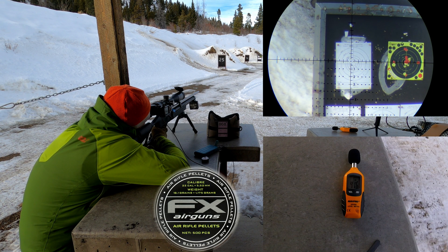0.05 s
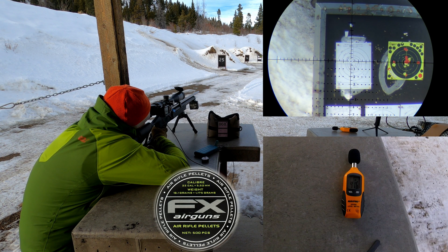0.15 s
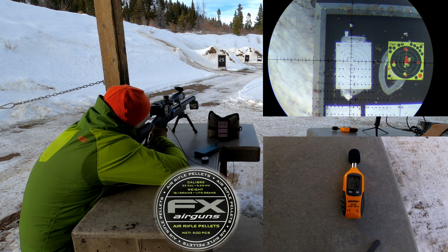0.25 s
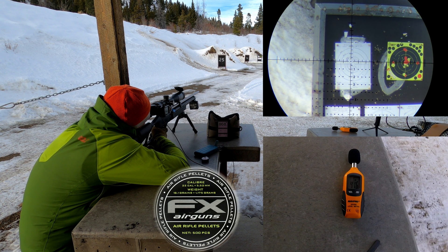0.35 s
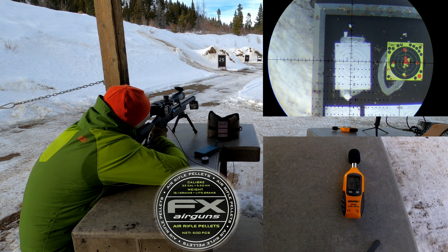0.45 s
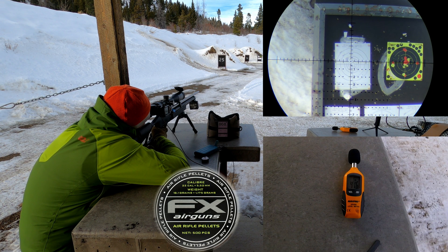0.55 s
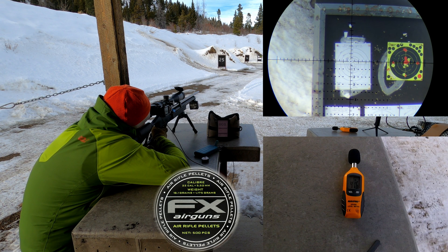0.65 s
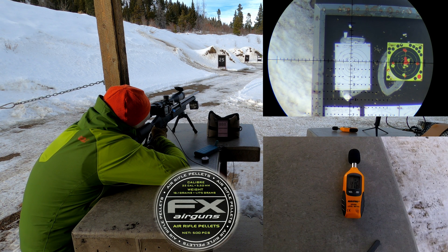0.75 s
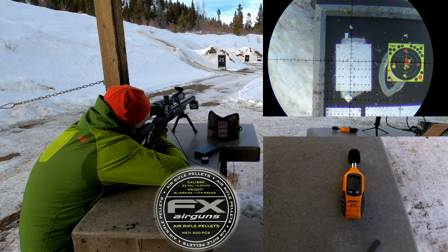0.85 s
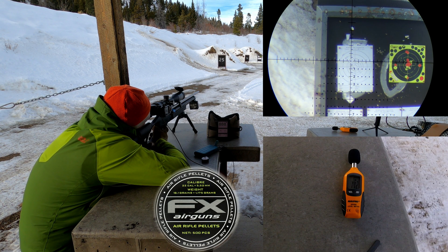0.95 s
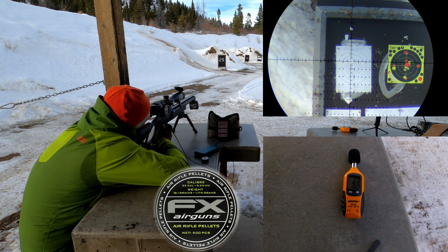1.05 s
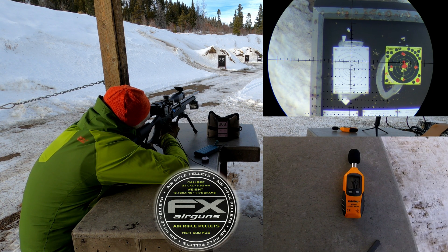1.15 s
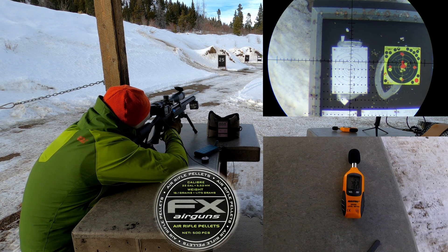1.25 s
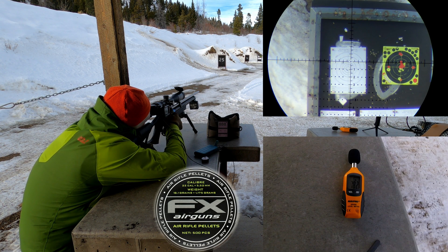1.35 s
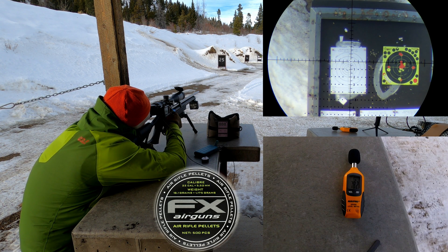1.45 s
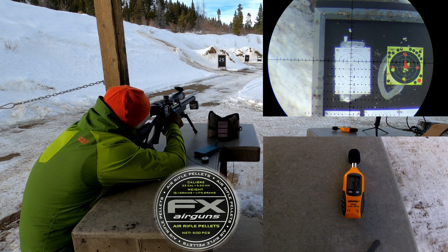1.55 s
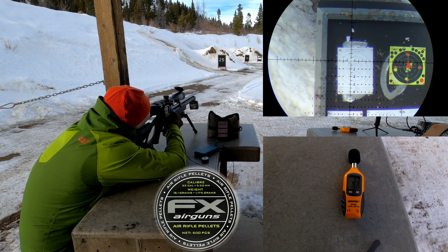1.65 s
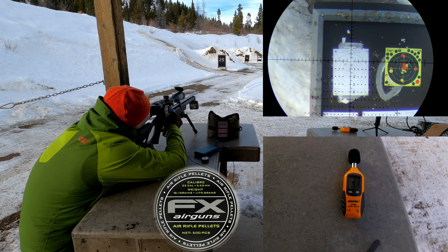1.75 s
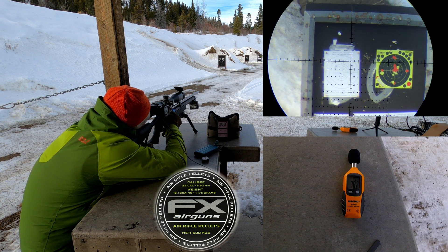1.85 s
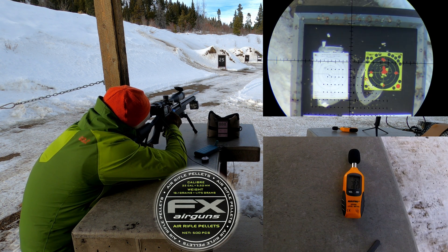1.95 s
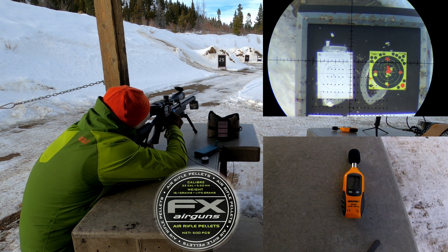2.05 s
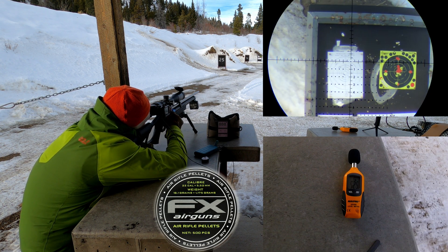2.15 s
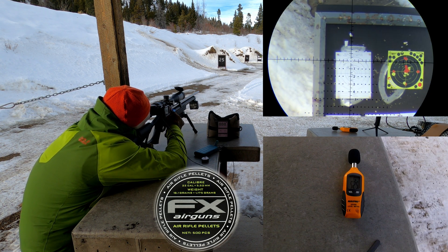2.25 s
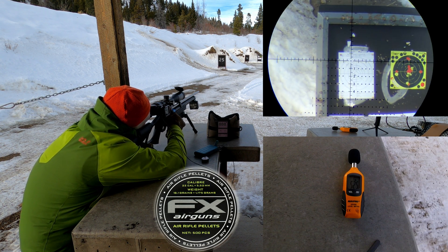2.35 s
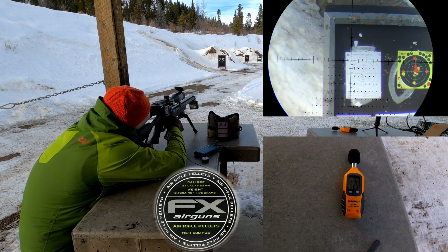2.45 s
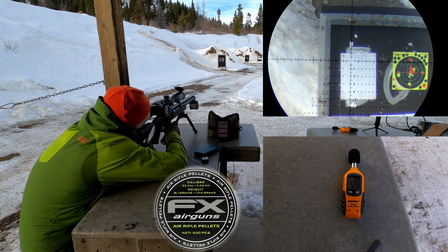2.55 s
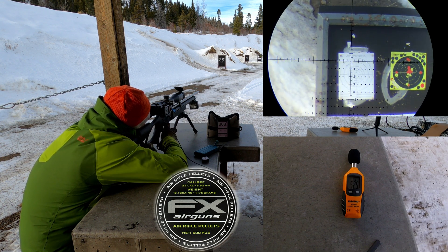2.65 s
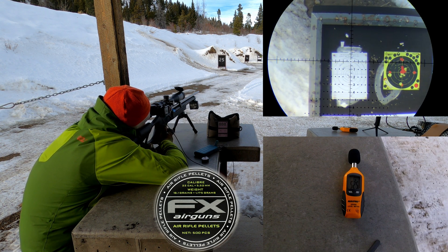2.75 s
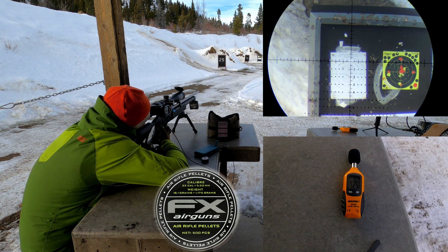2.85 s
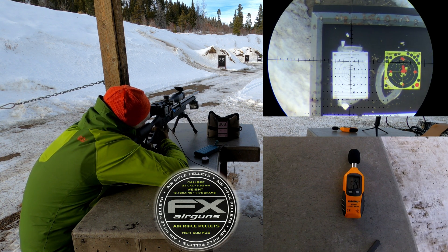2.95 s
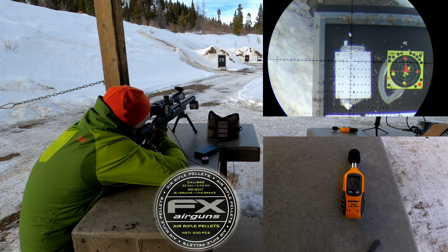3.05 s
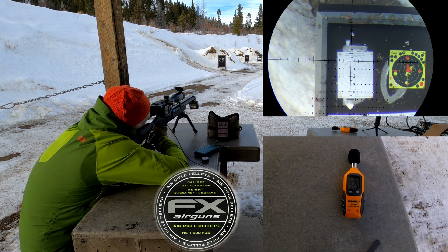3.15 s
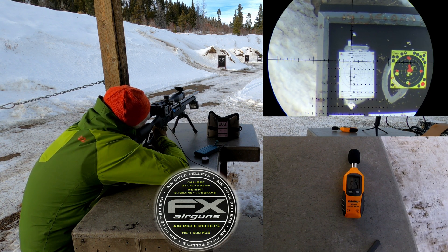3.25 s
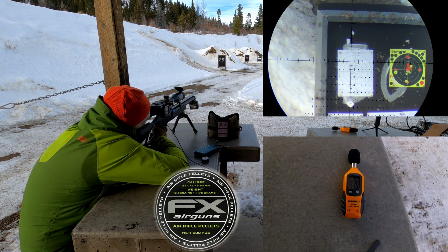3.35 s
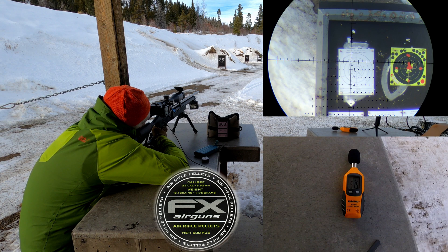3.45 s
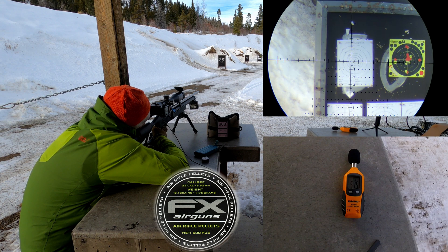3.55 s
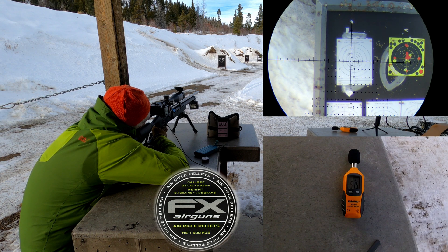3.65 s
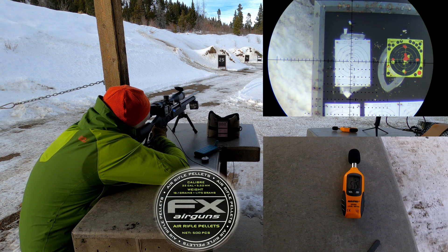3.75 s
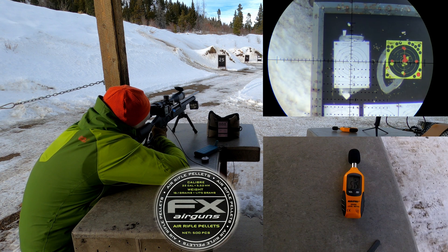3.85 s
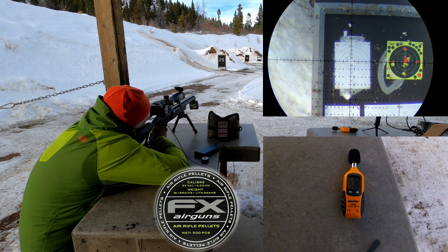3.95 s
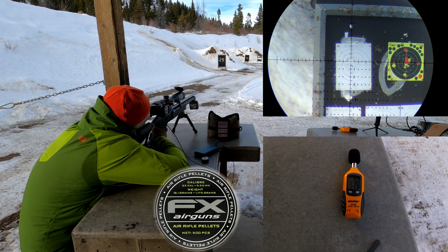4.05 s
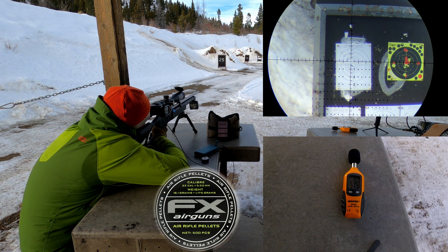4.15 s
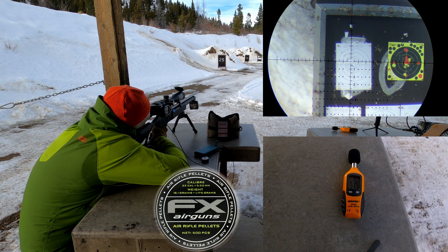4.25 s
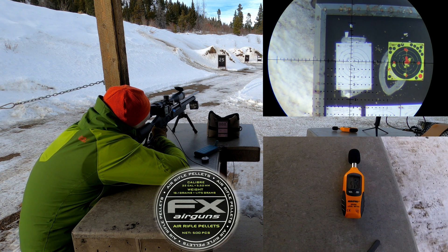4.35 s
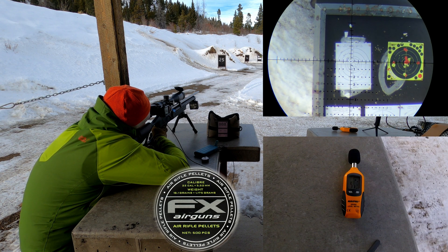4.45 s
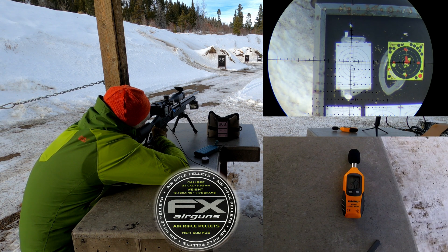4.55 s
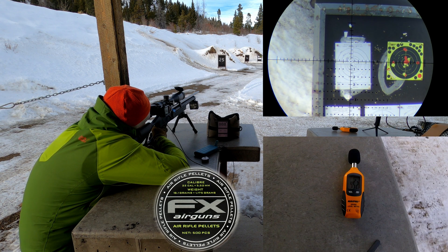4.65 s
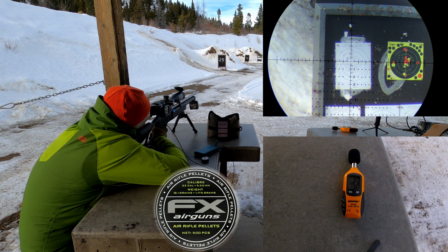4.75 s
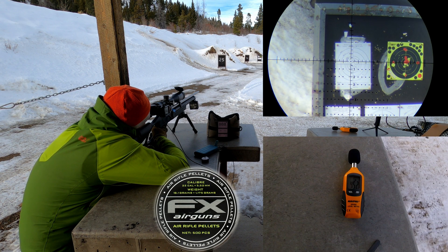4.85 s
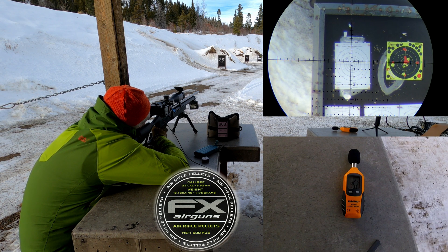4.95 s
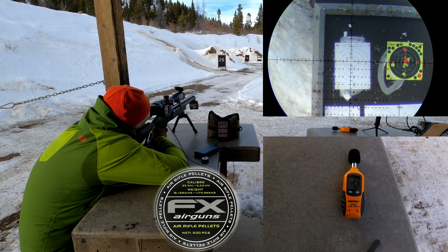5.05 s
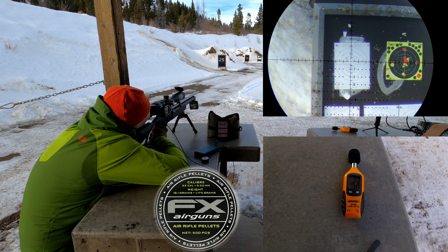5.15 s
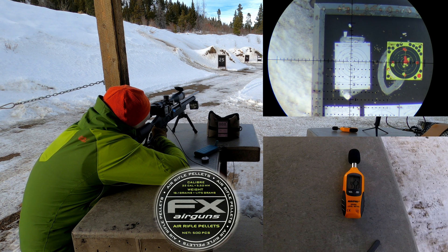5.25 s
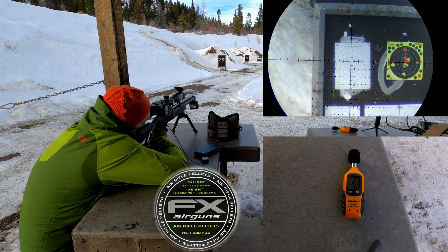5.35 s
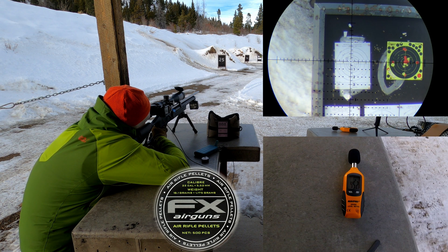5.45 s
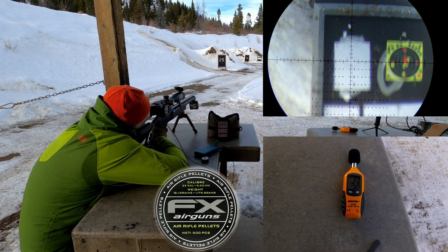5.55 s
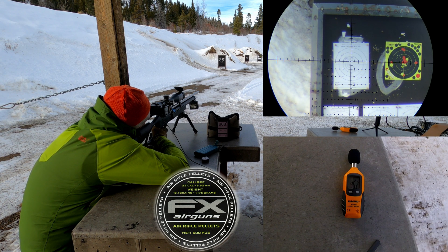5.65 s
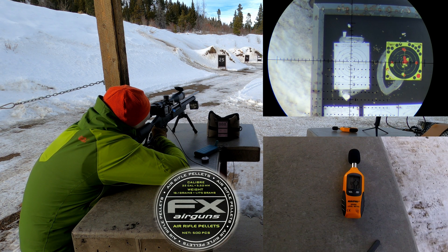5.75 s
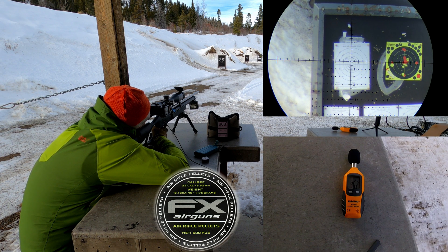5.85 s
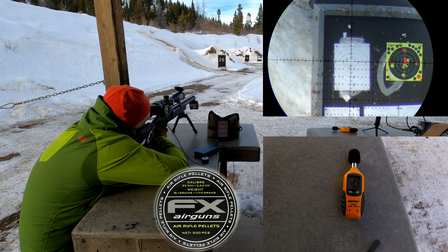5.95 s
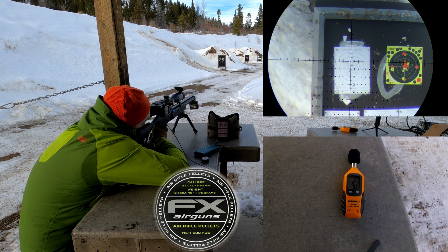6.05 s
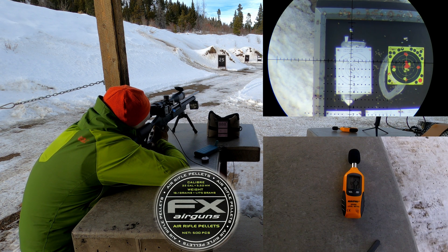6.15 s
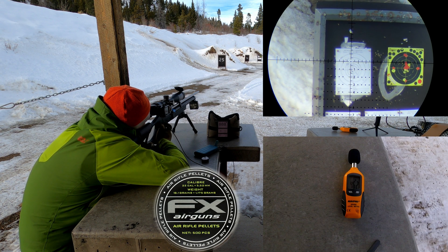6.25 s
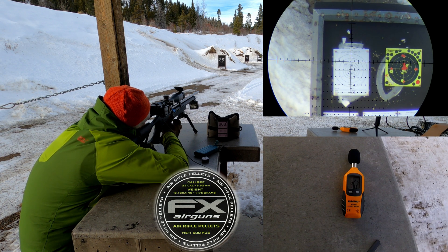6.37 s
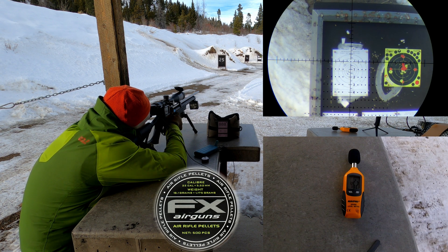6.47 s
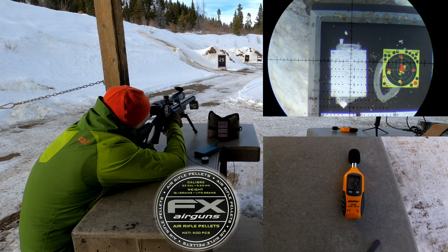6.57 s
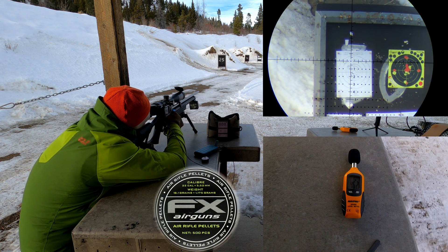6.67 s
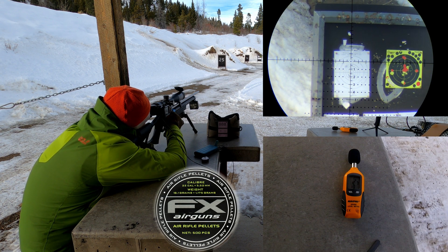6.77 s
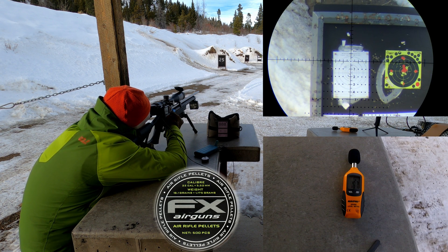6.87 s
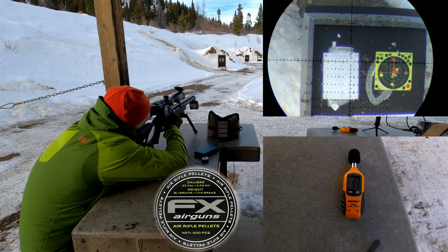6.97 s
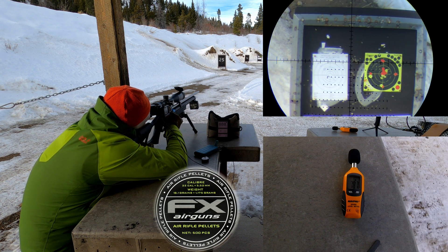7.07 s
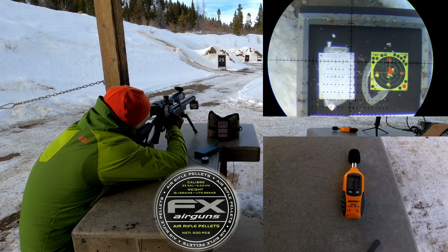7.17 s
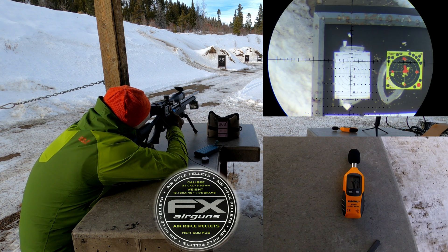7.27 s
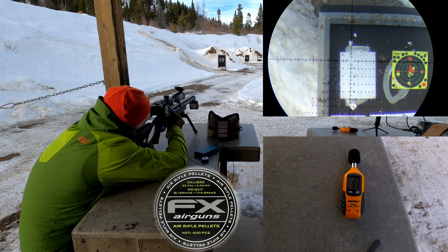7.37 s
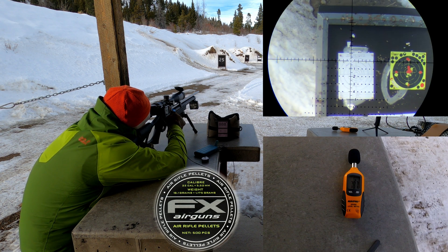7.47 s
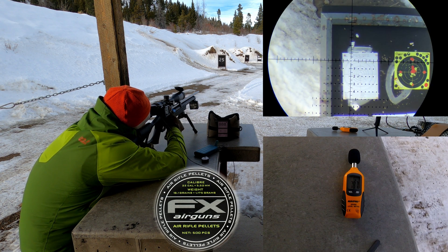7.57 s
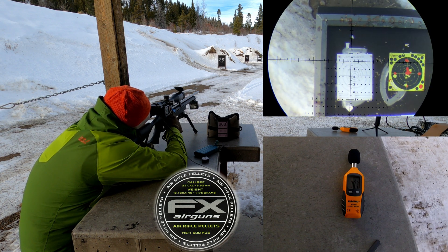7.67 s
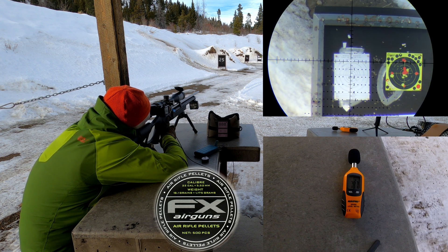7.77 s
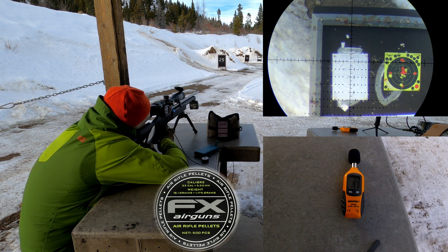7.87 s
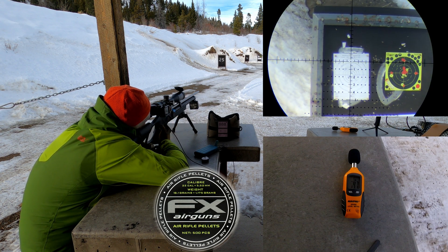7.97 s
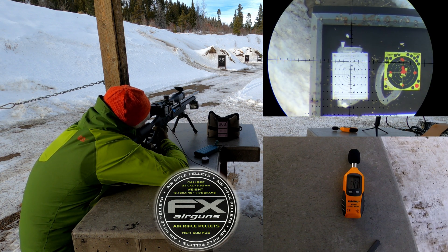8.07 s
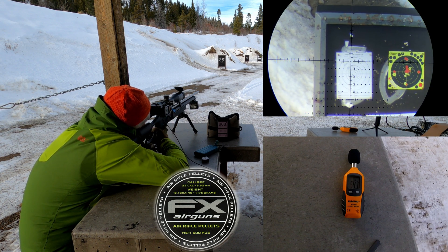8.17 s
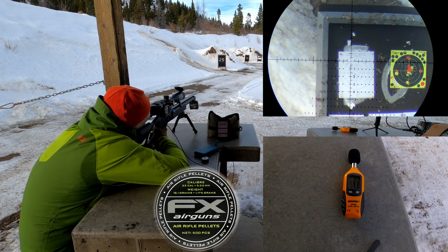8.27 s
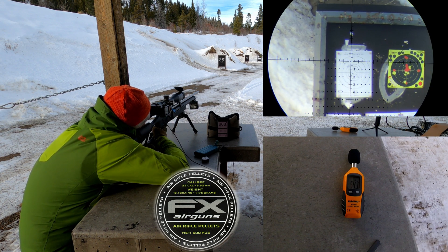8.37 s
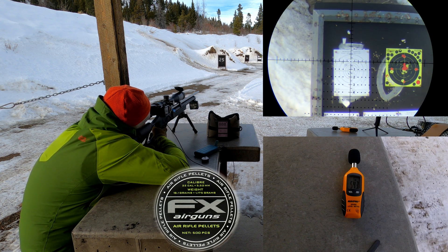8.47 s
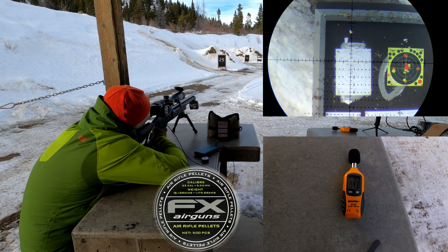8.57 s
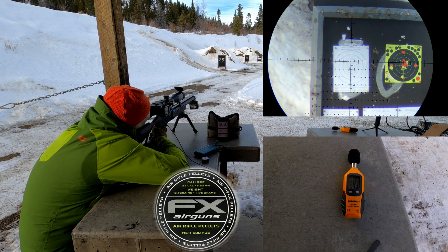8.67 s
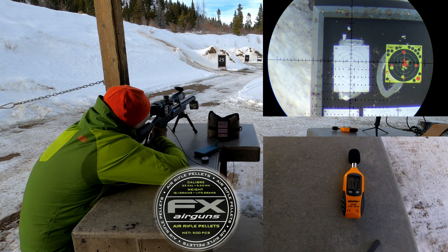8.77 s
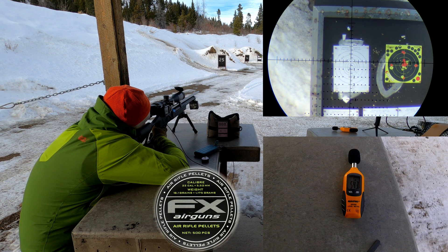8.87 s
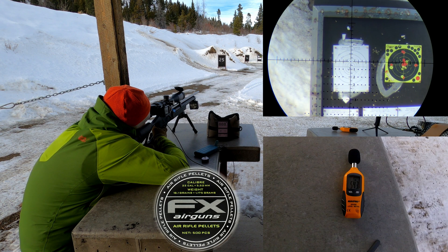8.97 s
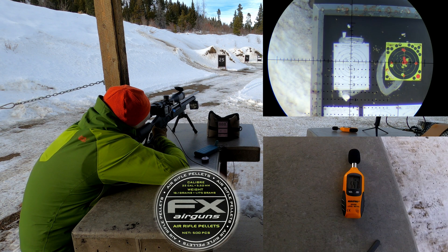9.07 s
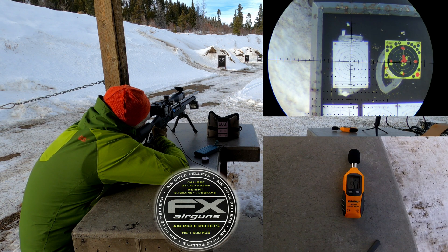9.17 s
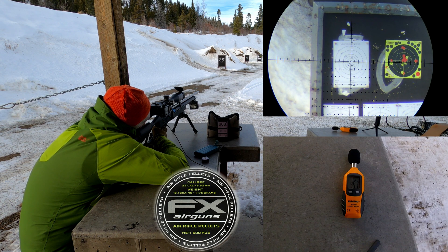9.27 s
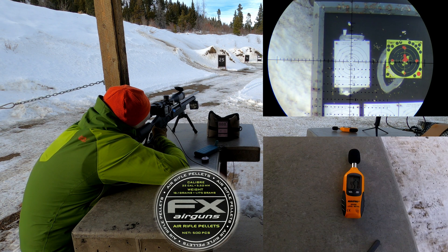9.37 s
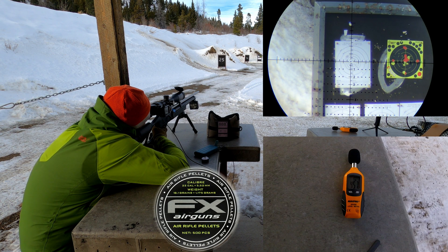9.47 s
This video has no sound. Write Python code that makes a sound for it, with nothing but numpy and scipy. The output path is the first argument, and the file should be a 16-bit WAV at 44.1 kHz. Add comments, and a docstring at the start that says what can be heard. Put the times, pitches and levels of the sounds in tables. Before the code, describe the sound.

A faint, dull wash of wind and far traffic runs throughout. At 0.35 s a close air rifle fires: a very short metallic snap, low bench thump and burst of air dying within about 0.4 s. A strong slap returns at 0.5 s, then weaker slaps and the pellet's distant hit at 0.64 to 0.8 s. A faint tick comes at 0.97 s; from 1.5 to 2.53 s the lever clicks, rattles and clacks in clusters, ending on a firm clack, with soft sleeve rustles until about 3.4 s. The background, ducked after the shot, creeps back. Small cloth touches occur near 4 s. At 5.63 s a second, similar shot cracks, with returns by 6.1 s. Cocking clacks run from 6.7 to 7.66 s, ending with the strongest, then rustling, a tiny tick at 7.94 s and quiet wind to 9.5 s.

```python
"""Air rifle under a range shelter

A pre-charged air rifle fires twice from a bench: ringing contacts, a bench boom and decaying bands of air noise.
From down range come the report off snow banks and the pellet on the far target: pulses with scattered tails.
At the bench the side lever is cocked after each shot (ticks ringing metal modes) and a sleeve rustles (noise).
Far off, wind and traffic are a patchy noise wash; gain control behind the one microphone cuts after loud sound."""
import sys
import numpy as np
from scipy import signal
from scipy.io import wavfile
from scipy.ndimage import uniform_filter1d

SR = 44100
rng = np.random.default_rng(int(sys.argv[2]) if len(sys.argv) > 2 else 0)


def wav_record(signal):
    """Record a signal, one row per channel, as 16-bit PCM in the file named by sys.argv[1]."""
    frames = np.transpose(np.atleast_2d(signal))
    bounded = np.clip(frames, -1, 1)
    # unit amplitude maps onto the largest positive 16-bit level
    quanta = np.round(bounded * 32767).astype(np.int16)
    wavfile.write(sys.argv[1], SR, quanta)


N = 419832

# distant wind in the trees and far traffic, relative spectrum: (frequency [Hz], density [dB per Hz])
WASH_SPECTRUM = [(15, -60.5), (25, -34), (59, -20), (91, -15), (122, -18), (156, -7), (281, -7.5),
                 (359, -1), (1050, -1), (1710, -8), (4380, -34.5), (5430, -36), (9550, -46), (12200, -45),
                 (15500, -77)]
# level of that wash ahead of the gain control: (time [s], level [dB])
WASH_LEVEL = [(0, -46.5), (2.5, -44.5), (3.5, -47), (5.5, -46), (8, -44.5), (8.8, -46), (9.52, -44)]
# rubbing cloth, relative spectrum: (frequency [Hz], density [dB per Hz])
CLOTH_SPECTRUM = [(880, -37), (1500, -13.5), (1860, 1), (3210, -4), (4310, -4), (6010, -10), (8460, -22),
                  (10600, -17.5), (11800, -28), (15500, -60)]
# strokes of the sleeve on jacket and bench: (start [s], hold [s], level [dB])
SLEEVE_STROKES = [(1.2, .15, -57), (2.62, .31, -52), (3.13, .2, -61), (4.03, .01, -63), (4.37, .01, -62),
                  (6.33, .24, -57), (7.75, .34, -52), (8.25, .2, -61)]
# arrivals from down range: (delay after hammer release [s], pulse level [dB], ring [Hz],
#   scatter relative to the pulse [dB], scatter t60 [s], treble relative to the dull part [dB])
RETURNS = [(0.1555, 6, 1880, -33, 0.16, 0), (0.1617, -3.5, 1190, -36, 0.22, 1),
           (0.288, -15.5, 1250, -27, 0.16, -16), (0.3376, -7.5, 1750, -33, 0.21, 12),
           (0.3435, -11.5, 1100, -26, .12, 10.5), (0.3595, -16.5, 1195, -40, 0.15, 11.5),
           (0.433, -25, 1776, -29, 0.041, -40)]
# contacts of lever, bolt and magazine: (time [s], level [dB], favoured ring [Hz],
#   gain above the middle corner [dB], rattle t60 [s], 0.5 at most is used)
CONTACTS = [(0.9653, -32.5, 1925, -18, 0.2), (1.497, -27.5, 2160, -3.5, 0.27),
            (1.5216, -24, 1480, -14, 0.26), (1.5788, -33.5, 2160, -16, 0.54),
            (1.718, -24.5, 1440, -7, 0.38), (1.7303, -16, 1220, -4, 0.37), (1.7797, -27.5, 1790, -2, .14),
            (1.809, -32, 1790, -18, 0.48), (1.8706, -18.5, 4050, 2, 0.11),
            (1.8842, -16.5, 3880, -0.5, 0.042), (1.8877, -14, 1970, 3, 0.25), (1.926, -17, 1790, -2, 0.2),
            (2.143, -35, 1500, -3, 0.22), (2.1577, -24, 1160, -7, 0.29), (2.1934, -32.5, 1360, -3.5, 0.2),
            (2.2714, -26, 2180, -9, .2), (2.2918, -28, 1880, -3.5, .17), (2.3055, -17.5, 1740, -4.5, 0.37),
            (2.3206, -23, 1700, 1, 0.31), (2.375, -27, 1600, -3, 0.28), (2.3895, -24.5, 1920, -4, 0.28),
            (2.4725, -19, 3730, -4.5, 0.18), (2.5259, -19, 1730, -5, 0.12), (2.5326, -12.5, 2510, -3, 0.21),
            (6.683, -31.5, 2200, -11, 0.19), (6.8279, -22, 1440, -12.5, 0.28),
            (6.8381, -13, 1700, -4.5, 0.3), (6.9834, -23, 1910, -9, 0.19), (6.9924, -25, 3730, 4, 0.18),
            (6.9994, -16, 1990, 3.5, 0.3), (7.0476, -16.5, 1610, -2.5, 0.23), (7.278, -32.5, 1850, -3, .28),
            (7.2889, -15.5, 2160, -9.5, 0.22), (7.395, -35.5, 2400, -14, 0.32),
            (7.431, -22, 1890, -6.5, 0.66), (7.452, -23.5, 2160, -1, 0.43), (7.4832, -24, 2470, -5, 0.16),
            (7.4964, -17, 2220, -6, 0.26), (7.5289, -21, 1750, -5.5, 0.16), (7.637, -22.5, 4000, -6, 0.2),
            (7.6641, -9, 2400, -3, 0.19), (7.939, -44, 4540, 1.5, 0.091)]
# ringing modes of the rifle's action: (frequency [Hz], level [dB], t60 [s])
ACTION_MODES = [(1155, -9, 0.04), (1648, -22.5, 0.11), (1815, -7, 0.041), (2058, 4.5, 0.0071),
                (2417, 5, 0.011), (2820, -3, 0.035), (3510, -2, 0.0083), (3990, 12, 0.0045),
                (4460, 5.5, 0.0043), (6080, 10, 0.0046), (6900, -31, 0.005), (9650, 1, .012)]
# hammer releases: (time [s], level [dB])
SHOTS = [(0.3519, 1.23), (5.6274, 2)]
# metal contacts and air pulses of one shot, hammer to muzzle:
#   (delay after hammer release [s], ring [Hz], level relative to the shot [dB], t60 [s])
FIRING_CONTACTS = [(0.0002, 2082, -17.5, .012), (0.0030, 3486, -12, 0.0057), (0.0045, 1742, -13, 0.0093),
                   (0.0047, 4680, -8, 0.0053), (0.0098, 914, -15, 0.006), (0.0119, 1773, -5.5, .008),
                   (0.0131, 2420, -5.5, 0.011), (0.0106, 4427, -21.5, 0.01), (0.015, 5100, -0.5, .006),
                   (0.0155, 6900, -8, 0.0031), (0.0143, 9530, -14, 0.0076), (0.0215, 4257, -9, 0.0075)]
# bench and shelter boom struck by the recoil: (frequency [Hz], level [dB], t60 [s])
BOOM_MODES = [(129, 0, 0.32), (143.6, -3.5, .2), (215, -5.5, 0.18), (301, -14, 0.48), (388, -18.5, 0.22),
              (540, -12.5, 0.13), (635, -21, 0.27)]
# escaping air and its scatter under the roof, relative spectrum: (frequency [Hz], density [dB per Hz])
BLAST_SPECTRUM = [(65, -30.5), (110, -8.5), (196, -9), (488, -20.5), (754, -21.5), (1460, -12),
                  (1660, -22.5), (1800, -15.5), (2510, -21.5), (5280, -20), (6110, -22), (10000, -28.5),
                  (15500, -54)]
# how fast that air dies: (frequency [Hz], t60 [s])
BLAST_T60 = [(120, .17), (300, 0.38), (1000, 0.25), (3000, 0.38), (7000, 0.32), (10000, 0.26), (15000, .1)]

# the sleeve: its strokes, then a faint steady rub while the arm works the lever
CLOTH_PATCHY_DB, CLOTH_FLICKERS_PER_S = .8, 30
STROKE_ATTACK_S, STROKE_RELEASE_S, STROKE_DEPTH_DB = .07, .07, 16
REACH_START_S, REACH_HOLD_S, REACH_FADE_S, REACH_DB = .4, 1.6, .25, -60   # start after hammer release
# arrivals from down range
RETURN_BAND_HZ, RETURN_T60_S = [740, 5200], .0045
RETURN_THUD_HZ, RETURN_THUD_DB = [231, 770], 4
RETURN_TREBLE_HZ = [3350, 6760]
SCATTER_BEND, SCATTER_PER_S = 1.17, 2500   # a bend over 1 makes the scatter die ever faster
# the rattle of tiny ticks in each contact, and the blow that stands over it
RATTLE_DB, RATTLE_PER_S, RATTLE_BROAD_DB, RATTLE_RISE_S = -29, 2500, 17.5, .0007
BLOW_DB, BLOW_T60_S, FIRST_TICK_DB = 12, .025, -5
# the action: modes near the favoured ring are struck harder, each contact reaches them unevenly
ACTION_DB, ACTION_SPREAD_DB = -14.5, 3
FAVOUR_DB, FAVOUR_OCTAVES = 10, .2
ACTION_BAND_HZ, MIDDLE_HZ, TREBLE_HZ, TREBLE_LOSS_DB = [1120, 14000], 3040, 5100, -11.5
STOCK_HZ, STOCK_DB = [294, 1080], 11   # the stock's dull knock under each contact
TOP_HZ, TOP_LOSS_DB = 11600, -12   # a steep step down at the top
# the shot
BOOM_DELAY_S, BOOM_DB = 0.018, -13.5
BLAST_DB, VALVE_S, BLAST_RISE_S, RATTLE_SHARE = -14, 0.0065, .006, 0.41
VALLEY_DB, VALLEY_T60_S = -33.5, 0.87   # the valley's long faint answer
# the microphone; its channels part a little in the treble
MIC_LOW_HZ = 115
PARTING_DB, PARTING_HZ, PARTING_S = -15.5, 12500, .0006
# gain control, peak rounding and the top cut
SENSE_S, THRESHOLD_DB, MOST_CUT_DB, ATTACK_S, RELEASE_DB_PER_S = 0.034, -26.5, 14.5, 0.16, 6.5
CEILING, CUTOFF_HZ = 1.15, 15700


def amp(db):
    """dB to gain."""
    return 10 ** (np.asarray(db) / 20)


def rms_one(x):
    """Scale to unit rms."""
    return x / np.sqrt(np.mean(x ** 2) + 1e-20)


def in_time(rows):
    """A level curve read at every sample."""
    return np.interp(np.arange(N) / SR, *np.transpose(rows))


def at_hz(points, hz):
    """A table of values by frequency, read on a log-frequency axis."""
    table_hz, values = np.transpose(points)
    return np.interp(np.log(hz), np.log(table_hz), values)


def butter(x, kind, hz):
    """Butterworth filter, designed at order 2."""
    return signal.sosfilt(signal.butter(2, hz, kind, fs=SR, output="sos"), x + 1e-18)


def shelf(x, hz, db):
    """Changes what lies above hz by db."""
    low = butter(x, "low", hz)
    return low + amp(db) * (x - low)


def drift(rate):
    """Slow chance: straight lines between random points of spread 1, rate points per second."""
    points = rng.standard_normal(int(N / SR * 60) + 2)
    return np.interp(np.arange(N) / SR * rate, np.arange(len(points)), points)


def impulses(times, gains):
    """A click train."""
    out = np.zeros(N)
    np.add.at(out, np.round(np.asarray(times) * SR).astype(int), gains)
    return out


def grains(per_s, uneven_db, size):
    """Dense random ticks of uneven size and either sign; rms 1."""
    sizes = amp(uneven_db * np.minimum(rng.exponential(1, size), 4))
    signed = sizes * rng.choice([-1, 1], size)
    return rms_one((rng.random(size) < per_s / SR) * signed)


def ring(clicks, hz, t60):
    """A two-pole resonator: a unit click starts a decaying sine of initial height 1."""
    radius = amp(-60 / (t60 * SR))
    angle = 2 * np.pi * hz / SR
    poles = [1, -2 * radius * np.cos(angle), radius * radius]
    return signal.lfilter([0, np.sin(angle)], poles, clicks + 1e-18)


def dying(start_s, t60):
    """An envelope that jumps to 1 and falls 60 dB in t60."""
    t = np.arange(N) / SR - start_s
    return (t >= 0) * amp(-60 * np.clip(t, 0, 3) / t60)


def swell(start_s, attack_s, hold_s, release_s, depth_db):
    """Attack, hold and release, straight in dB, settling at three depths down."""
    corners = start_s + np.cumsum([0, attack_s, hold_s, release_s, release_s])
    levels_db = [-depth_db, 0, 0, -depth_db, -3 * depth_db]
    return amp(in_time(list(zip(corners, levels_db)))) * (np.arange(N) / SR >= start_s)


def bands(spectrum):
    """Third-octave noise bands with their centres, about rms 1 all together."""
    edges = 22 * 2 ** np.arange(0, 9.7, 1 / 3)
    white = rng.standard_normal((2, N))   # neighbouring bands take turns
    centres = np.sqrt(edges[1:] * edges[:-1])
    gains = amp(at_hz(spectrum, centres)) * (centres > .85 * spectrum[0][0])
    gains = gains / np.sqrt(np.sum(gains ** 2 * np.diff(edges)) * 2.2 / SR)
    return [(hz, gain * butter(white[k % 2], "band", edges[k:k + 2]))
            for k, (hz, gain) in enumerate(zip(centres, gains)) if gain > 0]


def patchy(spectrum, patchy_db, rate):
    """Noise whose bands swell together slowly and flicker alone."""
    together = drift(1.9)
    return sum(band * amp(patchy_db * (together / 3 + drift(rate))) for hz, band in bands(spectrum))


def distant_wash():
    """Wind in the trees and far traffic: patchy noise on a slow level curve."""
    return amp(in_time(WASH_LEVEL)) * patchy(WASH_SPECTRUM, patchy_db=1.47, rate=8.6)


def sleeve():
    """Cloth friction is flickering noise, in strokes over a faint steady rub after each shot."""
    strokes = sum(amp(db) * swell(s, STROKE_ATTACK_S, hold_s, STROKE_RELEASE_S, STROKE_DEPTH_DB)
                  for s, hold_s, db in SLEEVE_STROKES)
    reach = sum(swell(s + REACH_START_S, REACH_FADE_S, REACH_HOLD_S, REACH_FADE_S, STROKE_DEPTH_DB)
                for s, db in SHOTS)
    return (strokes + amp(REACH_DB) * reach) * patchy(CLOTH_SPECTRUM, CLOTH_PATCHY_DB, CLOTH_FLICKERS_PER_S)


def returns():
    """Each arrival is a short pulse with the scatter of rough snow behind it and its own share of treble."""
    size = SR // 2
    out, t = np.zeros(N + SR), np.arange(size) / SR
    for pull_s, shot_db in SHOTS:
        for delay_s, peak_db, hz, scatter_db, t60, treble_db in RETURNS:
            scatter = amp(scatter_db - 60 * (t / t60) ** SCATTER_BEND)
            rough = scatter * grains(SCATTER_PER_S, uneven_db=0.5, size=size)
            fine = amp(-2) * scatter * rng.standard_normal(size)
            rough[0] = fine[0] = 1   # the pulse itself
            dull = butter(ring(rough, hz, RETURN_T60_S), "band", RETURN_BAND_HZ)
            dull = butter(dull, "low", RETURN_BAND_HZ[1])
            thud = amp(RETURN_THUD_DB) * butter(rough, "band", RETURN_THUD_HZ)
            bright = butter(butter(fine, "band", RETURN_TREBLE_HZ), "band", [3000, 9500])
            arrival = dull + thud + amp(treble_db) * bright
            out[round((pull_s + delay_s) * SR):][:size] += amp(shot_db + peak_db) * arrival
    return out[:N]


def cocking():
    """Each contact is a blow and a dying rattle of ticks, striking the action's modes unevenly."""
    size = SR // 2
    out, t = np.zeros(N + size), np.arange(size) / SR
    for s, db, ring_hz, bright_db, t60 in CONTACTS:
        rattle = amp(-60 * t / np.clip(t60, .02, .5))
        blow = amp(BLOW_DB - 60 * t / BLOW_T60_S)
        fade = amp(RATTLE_DB) * (rattle + blow) * (1 - np.exp(-t / RATTLE_RISE_S))
        broad, struck = (fade * grains(RATTLE_PER_S, uneven_db=-0.5, size=size) for _ in range(2))
        struck[0] = amp(FIRST_TICK_DB)
        spread = rng.normal(0, ACTION_SPREAD_DB, len(ACTION_MODES))
        metal = amp(RATTLE_BROAD_DB) * broad
        for (hz, mode_db, mode_t60), own_db in zip(ACTION_MODES, spread):
            near_db = FAVOUR_DB * np.exp(-(np.log2(hz / ring_hz) / FAVOUR_OCTAVES) ** 2)
            metal += amp(mode_db + own_db + near_db + ACTION_DB) * ring(struck, hz, mode_t60)
        metal = shelf(shelf(metal, MIDDLE_HZ, bright_db), TREBLE_HZ, TREBLE_LOSS_DB)
        knock = amp(STOCK_DB) * butter(struck, "band", STOCK_HZ)
        out[round(s * SR):][:size] += amp(db) * (knock + butter(metal, "band", ACTION_BAND_HZ))
    low = signal.sosfilt(signal.cheby2(8, 40, TOP_HZ, fs=SR, output="sos"), out[:N])
    return low + amp(TOP_LOSS_DB) * butter(out[:N], "high", TOP_HZ)


def firing_contacts():
    """Metal contacts and air pulses, hammer to muzzle, each a short decaying ring."""
    pulls, shot_db = np.transpose(SHOTS)
    out = np.zeros(N)
    for delay_s, hz, peak_db, t60 in FIRING_CONTACTS:
        chance_db = rng.normal(0, 1, len(shot_db))
        out += ring(impulses(pulls + delay_s, amp(shot_db + peak_db + chance_db)), hz, t60)
    return out


def recoil_boom():
    """The recoil strikes the low modes of bench and shelter."""
    pulls, shot_db = np.transpose(SHOTS)
    recoil = impulses(pulls + BOOM_DELAY_S, amp(shot_db + BOOM_DB))
    return sum(amp(mode_db) * ring(recoil, hz, t60) for hz, mode_db, t60 in BOOM_MODES)


def air_blast():
    """Escaping air is noise that dies band by band, with the valley's faint answer above 1500 Hz."""
    t = np.arange(N) / SR
    rise = np.zeros(N)
    for s, db in SHOTS:
        # the hammer rattles first, then the valve opens
        opening = np.clip((t - s - VALVE_S) / BLAST_RISE_S, RATTLE_SHARE, 1)
        rise += opening * np.clip((t - s) / 0.0017, 0, 1) * (t < s + 3)
    out = np.zeros(N)
    for hz, band in bands(BLAST_SPECTRUM):
        decay = np.zeros(N)
        for s, db in SHOTS:
            valley = (hz > 1500) * amp(VALLEY_DB) * dying(s, VALLEY_T60_S)
            decay += amp(db + BLAST_DB) * (dying(s, at_hz(BLAST_T60, hz)) + valley)
        out += band * rise * decay
    return out


def shots():
    """The report at the bench: contacts, recoil boom and rush of air."""
    return firing_contacts() + recoil_boom() + air_blast()


def scene():
    """One microphone feeds both channels; it loses the deep bass of rifle and returns."""
    wash = distant_wash()
    loud = shots() + returns() + cocking()
    loud = butter(butter(loud, "high", MIC_LOW_HZ), "high", MIC_LOW_HZ)
    mono = loud + sleeve() + wash
    lagged = np.roll(mono, round(PARTING_S * SR))
    side = amp(PARTING_DB) * butter(lagged, "high", PARTING_HZ)
    return mono - side * [[1], [-1]]


def record(dry):
    """Gain control cuts after loud sound and lets go at a steady pace; peaks are rounded, the top is cut."""
    window = int(SENSE_S * SR)
    # the origin makes the window look back only
    power = uniform_filter1d(np.mean(dry, axis=0) ** 2, size=window, origin=window // 2 - 1)
    # a running maximum over a rising slope falls back at the release pace
    slope = RELEASE_DB_PER_S * np.arange(N) / SR
    held_db = np.maximum.accumulate(10 * np.log10(np.abs(power) + 1e-12) + slope) - slope
    cut_db = np.clip(held_db - THRESHOLD_DB, 0, MOST_CUT_DB)
    r = np.exp(-1 / (ATTACK_S * SR))
    smooth_cut_db = signal.lfilter([1 - r], [1, -r], cut_db)
    levelled = dry * amp(-smooth_cut_db)
    limited = CEILING * np.tanh(levelled / CEILING)
    return signal.sosfilt(signal.cheby2(12, 60, CUTOFF_HZ, fs=SR, output="sos"), limited)


dry = scene()
out = record(dry)
wav_record(out)
```